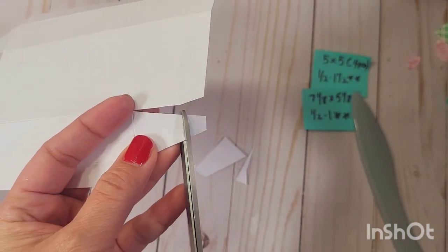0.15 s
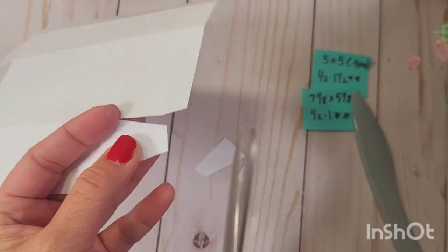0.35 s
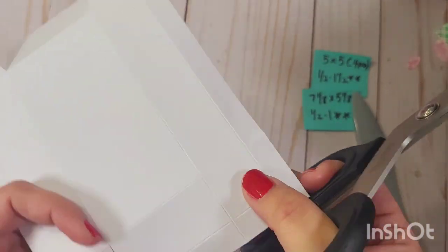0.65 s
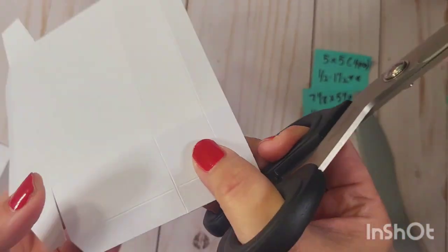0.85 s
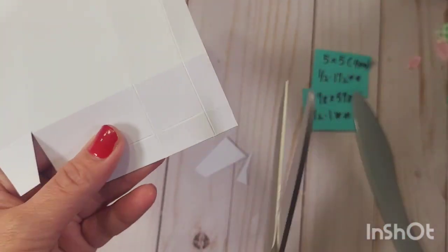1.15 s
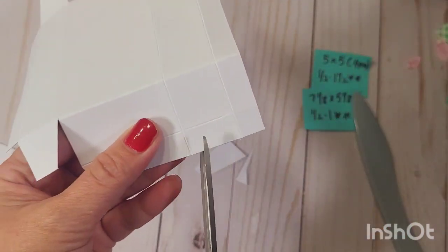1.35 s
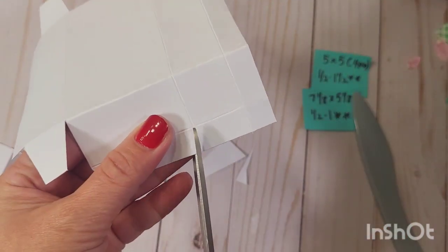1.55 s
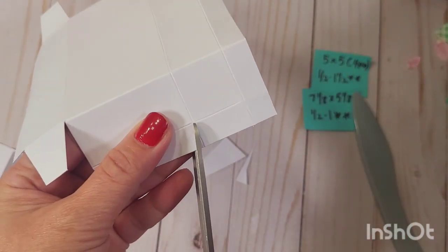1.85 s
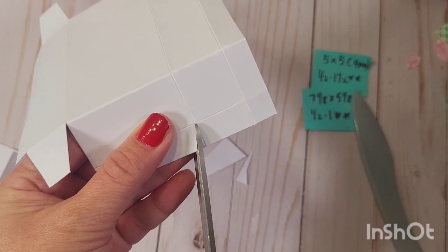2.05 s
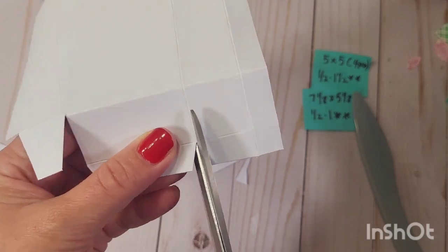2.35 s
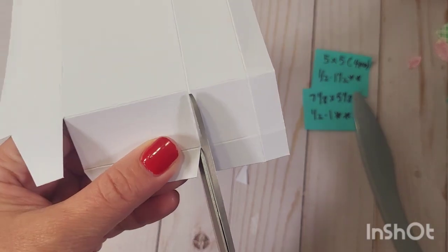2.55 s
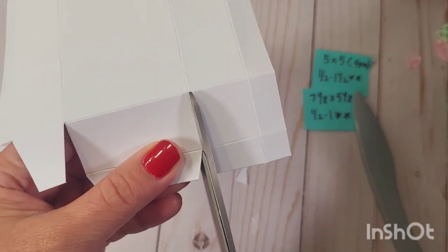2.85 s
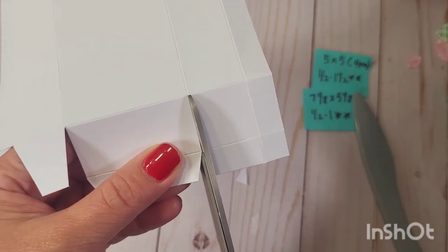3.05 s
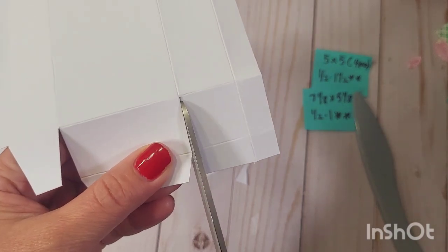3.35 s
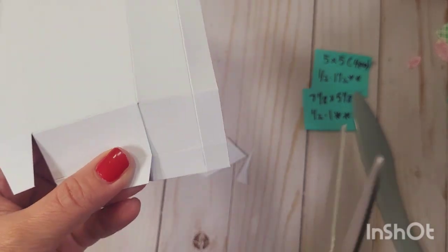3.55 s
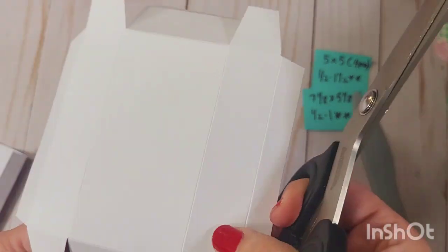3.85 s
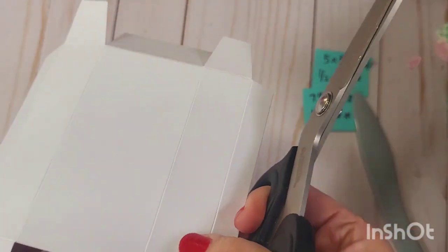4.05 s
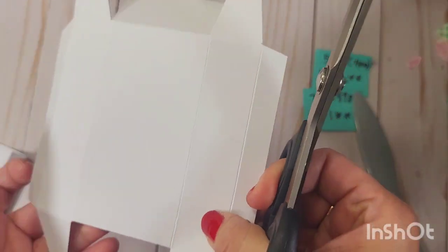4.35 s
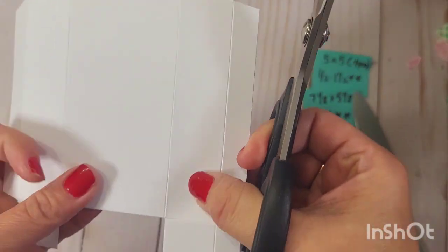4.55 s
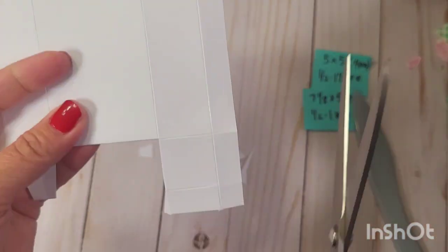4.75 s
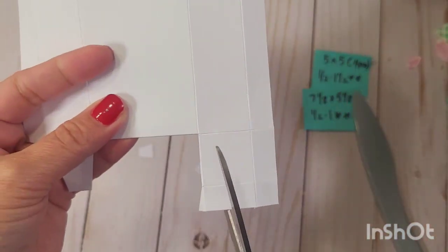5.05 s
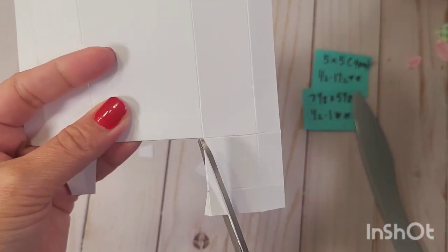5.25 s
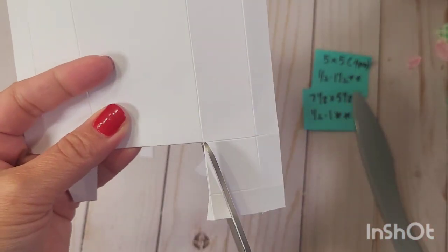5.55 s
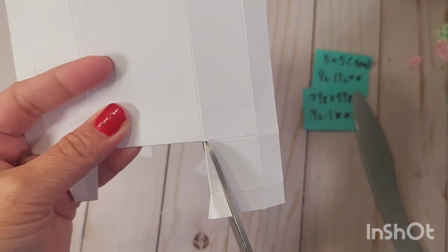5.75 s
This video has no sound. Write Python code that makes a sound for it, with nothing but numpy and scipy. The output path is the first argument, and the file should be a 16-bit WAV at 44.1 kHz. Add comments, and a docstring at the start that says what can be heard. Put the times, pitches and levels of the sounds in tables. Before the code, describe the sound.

Very close stereo sound of scissors and a stiff card sheet at a craft table. A faint squeak leads to a crisp snip, then steel scrapes, card rustle and a soft low puff as the sheet swings. A second snip follows, then crackly slips, a tiny scrap tap, more handling, and a final slow, jerky cut. Small dry room, very quiet low hum behind.

```python
"""Craft table in a small, dry room: scissors trim the flaps of a cardstock box.
Blades squeak, crunch through card and clack shut: friction noise and struck steel modes.
The sheet rubs, slips, flexes and ticks: fibre clicks through card resonances; swung, it fans air and rumbles.
The blades hiss open, a scrap taps the table, and a last slow cut bites in jerks.
Behind: quiet air and a faint, wavering low drone of four partials, like a far motor."""
import sys
import numpy as np
from scipy import signal
from scipy.fft import rfft, irfft, next_fast_len
from scipy.io import wavfile
from scipy.ndimage import map_coordinates

SR = 44100
rng = np.random.default_rng(int(sys.argv[2]) if len(sys.argv) > 2 else 0)


def digitize_waveform(pressure):
    """Quantize a signal to 16-bit integers and store it at the path in sys.argv[1].

    Rows of a 2-D input are taken as channels; values are limited to [-1, 1].
    """
    field = np.atleast_2d(pressure).T
    bounded = np.clip(field, -1, 1)
    quanta = np.round(bounded * 32767).astype(np.int16)
    wavfile.write(sys.argv[1], SR, quanta)


N = 260799
TIME = np.arange(N) / SR

# Far drone. Each row: time in seconds, mean pitch in Hz.
DRONE_PITCH = [(0, 76.44), (0.498, 70), (1.751, 84), (2.3, 86.94), (2.6, 70.7), (4.751, 69.2),
               (5.452, 77.36), (5.91, 81)]
# Drone partials, from the fundamental up: level in dB.
DRONE_PARTIALS_DB = [2.5, -17, -19, -20.5]
# Drone swells. Each row: start in seconds, end in seconds, level in dB.
DRONE_SWELLS = [(4.303, 4.455, -62.5), (5.012, 5.062, -63), (5.35, 5.457, -55.5), (5.79, 5.91, -54)]
DRONE_DB, DRONE_SWELL_S = -73.5, 0.08
# Room air spectrum. Each row: frequency in Hz, relative density in dB per Hz.
AIR_COLOUR = [(25, -13), (70, 3.5), (170, -15.5), (400, -26.5), (700, -27.5), (1500, -31), (5000, -38.5),
              (10000, -41.5), (16000, -38.5)]
AIR_DB = -69.5

# Squeak of blades pressed into card. Each row: time in seconds, level in dB.
SQUEAK = [(0.0, -75), (0.03, -65), (0.08, -81.5), (0.12, -82)]
# Squeak resonances. Each row: frequency in Hz, relative level in dB, T60 in seconds.
SQUEAK_MODES = [(1900, -6, 0.023), (2300, -10.5, 0.02), (3532, -2.5, 0.02), (5200, -6, 0.02),
                (7600, -0.5, 0.0061)]
# Blades sing sliding shut: end of swell in seconds, start of decay in seconds, level in dB.
SING = (0.17, 0.16, -56.5)
# Singing tone. Each row: frequency in Hz, relative level in dB, T60 in seconds.
SING_MODES = [(2390, 0, .04)]

# Steel catching on steel. Each row: time in seconds, hiss level in dB, decay constant in seconds,
# blade ring above the hiss in dB.
SCRAPES = [(0.174, -57, 0.021, 13.5), (0.311, -42, 0.0028, 1.5), (0.384, -43.5, 0.0089, 1),
           (0.508, -54.5, 0.0033, -6), (.584, -33, 0.0033, -7), (1.101, -41, 0.00071, -2),
           (1.11, -50.5, 0.013, 4.5), (3.604, -51, 0.0017, -12), (3.671, -38.5, 0.0014, -37),
           (3.766, -36, 0.0018, -26), (4.635, -44, 0.0024, -29), (4.726, -43.5, 0.0062, 3.5)]
# Blades swinging open. Each row: stop in seconds, hiss level in dB, blade ring above the hiss in dB.
OPENINGS = [(1.351, -52, -5.5), (3.721, -41, -9.5), (4.995, -49, -19)]
# Edge hiss spectrum. Each row: frequency in Hz, relative density in dB per Hz.
STEEL_COLOUR = [(2000, -19), (4000, -0.5), (7000, 10.5), (11000, 13.5), (15500, 17), (17000, 2)]
# Blade ring spectrum. Each row: frequency in Hz, relative density in dB per Hz.
BLADE_COLOUR = [(2150, -16), (2450, -8.5), (2800, -9), (3800, -7.5), (4800, -0.5), (6200, -6.5), (7700, -3),
                (10000, -10)]
SCRAPE_MAX_RISE_S, OPENING_RISE_S, OPENING_FALL_S = 0.012, .036, 0.014

# Blades snapping shut. Each row: time in seconds, clack gain in dB, crunch gain in dB,
# crunch rise in seconds, card thump gain in dB, left-over-right pan in dB.
SNIPS = [(0.1946, -8.5, -28.0, 0.003, -41.0, 1.5), (2.0969, -8.8, -27.0, 0.006, -25.5, 0.5)]
# Ring of the held scissors. Each row: frequency in Hz, relative level in dB, T60 in seconds.
BLADE_MODES = [(1430, -20.5, .022), (2447, -9, .032), (2940, -18, .016), (4480, -9.5, .012),
               (4660, 1.5, .013), (5050, -6, .016), (6500, -13.5, .022), (7080, -10, .012),
               (7400, -9, .011), (9700, -25, .008), (11500, -19, .007)]
# Thump of the parting card. Each row: frequency in Hz, relative level in dB, T60 in seconds.
THUMP_MODES = [(440, -17.5, 0.075), (600, -9, .04), (840, 3, 0.016), (1095, 2.5, 0.016)]
# Noise in the clack. Each row: frequency in Hz, relative density in dB per Hz.
CRACK_COLOUR = [(250, -20.0), (600, -8.5), (1000, -3.5), (1400, -6.5), (1900, -9.5), (2500, 0.0),
                (3400, -4.0), (4700, 1.5), (6000, -6), (7400, 3.5), (9500, -12), (16000, -17.5)]
CRUNCH_BANDS_DB = [-17, 0, -4]   # flexing, body, hiss

# Sheet sliding and turning. Each row: start in seconds, end in seconds, mid-move body level in dB,
# swell over the move in dB, flexing above the body in dB, hiss above the body in dB.
RUBS = [(0.338, 0.386, -58.5, 6, -21, 3), (0.429, 0.532, -68, -10.5, -7, -5),
        (0.544, 0.639, -50.5, -8, -3.5, 4.5), (0.67, .775, -56.5, -9, 0, 3.5),
        (0.822, 0.939, -46, -2.5, 1.5, -5), (0.967, 1.001, -55, -9, -1.5, 0.5),
        (1.04, 1.337, -68.5, 0, -2, 3), (1.562, 1.619, -69, -3.5, 4, -4), (2.189, 2.284, -69, 16, 2, -2),
        (2.304, 2.41, -53.5, -3, -14, -5), (2.421, 2.583, -63.5, 10.5, -7.5, -6),
        (2.94, 2.981, -62.5, 6, -10, -8), (3.349, 3.434, -50.5, 6.5, -6, -2.5),
        (3.48, 3.558, -74.5, 1, -4, 8), (3.771, 3.847, -59.5, -14, 2, -3),
        (3.86, 3.95, -57, -1.5, -3.5, -1), (4.016, 4.11, -63.5, 9.5, -6.5, 3.5),
        (4.1, 4.24, -66.5, 9, -12, -1), (4.32, 4.54, -69.5, 0.5, 3, -1.5),
        (4.543, 4.749, -64.5, -0.5, -1, 4), (4.771, 4.829, -78.5, -4, -0.5, 6),
        (5.019, 5.098, -59, 8.5, -5, -5.5)]
RUB_ATTACK_S, RUB_RELEASE_S, GRIP_DB = 0.008, 0.014, 0.6
CRINKLES_PER_S, CRINKLE_DB, CRINKLE_S = 22, 2, .003   # small catches in a sliding sheet

# Slips of card on blades and fingers. Each row: time in seconds, body level in dB,
# flexing above the body in dB (ahead of FLEX_TRIM_DB), hiss above the body in dB, decay constant in seconds.
SLIPS = [(0.541, -56, -15, 12, .006), (.622, -40.5, 1.5, -18, 0.017), (0.825, -37, -22, 4, 0.015),
         (0.842, -34.5, 8.5, -5, 0.012), (2.065, -37, -14, -2.5, 0.004), (2.251, -51.5, 8, -3, 0.0058),
         (2.322, -44.5, 0, -8, 0.013), (2.957, -50, -2, -4, 0.015), (2.982, -50.5, -8, -4, 0.0014),
         (3.01, -52, -1.5, -12, 0.0017), (3.208, -45.5, 0, -4.5, 0.0033),
         (3.236, -32.5, -4.5, -7.5, 0.0037), (3.249, -31, -5, -6, 0.0027), (3.265, -37.5, 5, -2, 0.0047),
         (3.275, -30, -1, -0.5, 0.0099), (3.435, -44.5, 13.5, -15, 0.0082), (3.44, -33, -30, 1, 0.0087),
         (3.465, -46, 15, -25, 0.0034), (3.763, -57, 8, 0, 0.0043), (3.896, -44, -0.5, -7, 0.0087),
         (3.967, -42.5, 4.5, 2.5, 0.00067), (4.119, -34.5, -3, -4.5, 0.0074), (4.133, -45, 9.5, -9, 0.011),
         (4.181, -52, 7, -6, 0.019), (4.241, -41.5, 11.5, -7, 0.0089), (4.266, -38, -19, -4, 0.0051),
         (4.412, -53.5, 4, -1.5, 0.033), (4.452, -45, -2, -23, 0.001), (5.019, -58, 12.5, -1, 0.01),
         (5.164, -71, 19.5, -7.5, 0.04), (5.309, -70.5, 22, -12, 0.014)]
SLIP_RISE_S, FLEX_TRIM_DB = 0.0039, -4.0
PUFF_DB, PUFF_RISE_S, PUFF_FALL_S = -20.5, .012, 0.01   # air pushed by a flexing sheet

# Air pushed at the microphone by each swing of the sheet. Each row: time in seconds, level in dB.
WAFTS = [(0.55, -43.5), (.58, -39.5), (.845, -33.5)]
# Moving air spectrum. Each row: frequency in Hz, relative density in dB per Hz.
WAFT_COLOUR = [(25, -9), (60, 8), (100, 12), (160, -0.5), (260, -4.5), (500, -41.5)]
# Hollow rumble of the swung sheet. Each row: time in seconds, level in dB.
RUMBLE = [(0.85, -66), (1.0, -50), (1.1, -58.5), (1.35, -65), (1.6, -82.5)]
# Rumble spectrum. Each row: frequency in Hz, relative density in dB per Hz.
RUMBLE_COLOUR = [(150, -13), (240, 1.5), (300, 2.5), (400, -2.5), (600, -29)]
WAFT_RISE_S, WAFT_FALL_S, WAKE_DB, WAKE_S = 0.012, 0.041, -14, 0.15   # each gust leaves a slower wake

# Ring of a light scrap. Each row: frequency in Hz, relative level in dB, T60 in seconds.
TAP_MODES = [(2320, -35, 0.011), (2260, 3, 0.027), (2820, -2, 0.016), (3830, -0.5, 0.0049)]
TAP_S, TAP_DB = 3.3965, -27

# Slow cut. Each row: time in seconds, bites per second, level in dB.
SLICE = [(5.463, 34.7, -62), (5.655, 31, -59), (5.77, 31, -61.5), (5.80, 43, -59.5), (5.91, 34.4, -39.5)]
# Slow cut by band, flexing then body then hiss: level in dB.
BITE_BANDS_DB = [-5.5, -3.5, -4]
BITE_RISE_S, BITE_FALL_S, BITE_DRAG_DB = .003, .005, -10   # the blades drag on between bites
BITE_SCATTER_DB, BITE_SCATTER_S = 1.8, .002

# Card friction spectrum. Each row: frequency in Hz, relative density in dB per Hz.
CARD_COLOUR = [(120, 3.5), (400, 6.5), (680, -7.5), (1000, -14.5), (1800, -19), (3000, -13), (5000, -15),
               (7500, -23.5), (10000, -28), (16000, -27.5)]
# Resonances of the held sheet. Each row: frequency in Hz, width in Hz, nominal boost in dB.
CARD_MODES = [(215, 17, 3.5), (406, 110, 6.5), (1043, 120, 4), (1435, 190, 13.5), (2310, 410, 8.5),
              (3470, 350, 3.5), (4620, 1400, 2.5), (7750, 900, 4.5)]
# Sound each port hears alone, against what both share, flexing then body then hiss: level in dB.
SHEET_SPREAD_DB = [-12, -3, 3]
SHEET_ECHO_S, SHEET_SWAY_S, SHEET_ECHO_DB = .0013, .00025, -5
# Table echo delay, left then right, in seconds.
TABLE_ECHO_S = (.00066, .00043)
TABLE_ECHO_DB = -9
ROOM_T60_S, TREBLE_T60_S, ROOM_DB = 0.098, .075, -10.5
RIGHT_LAG_S, BLADE_LAG_S = .00007, .00009
CUTOFF_HZ = 16300


def from_db(db):
    """Decibels to gain."""
    return 10 ** (np.asarray(db) / 20)


def rms_one(x):
    """Scale to unit power."""
    return x / np.sqrt(np.mean(x ** 2) + 1e-20)


def level(rows, column):
    """Gain from one dB column of a curve, gated by 10 ms ramps centred on both ends."""
    s, db = np.array(rows)[:, 0], np.array(rows)[:, column]
    gate = np.interp(TIME, [s[0] - .005, s[0] + .005, s[-1] - .005, s[-1] + .005], [0, 1, 1, 0])
    return gate * from_db(np.interp(TIME, s, db))


def coloured(x, spectrum):
    """Filter by a smooth spectrum, dB linear in log frequency; unit power."""
    hz, db = np.transpose(spectrum)
    size = next_fast_len(N, real=True)
    bins_hz = np.maximum(np.arange(size // 2 + 1) * SR / size, 1)
    gain = from_db(np.interp(np.log(bins_hz), np.log(hz), db))
    return rms_one(irfft(rfft(x, size) * gain, size)[..., :N])


def drift(per_s):
    """Slow random wander with a spread of 1."""
    return coloured(rng.standard_normal(N), [(per_s, 0), (10 * per_s, -60), (100 * per_s, -120)])


def burst(s, rise_s, fall_s):
    """Envelope that swells quickly up to time s and dies away."""
    envelope = np.zeros(N)
    near = slice(max(round((s - .05) * SR), 0), round((s + .2) * SR))
    t = TIME[near] - s
    envelope[near] = np.exp(-np.where(t < 0, (t / rise_s) ** 2, t / fall_s))
    return envelope


def stroke(start, end, attack_s, release_s):
    """Envelope that swells up to its start, holds, and dies away after its end."""
    before = (np.maximum(start - TIME, 0) / attack_s) ** 2
    after = np.maximum(TIME - end, 0) / release_s
    return np.exp(-np.minimum(before + after, 40))


def ring(x, modes):
    """Decaying tones set off by x; they radiate little below their pitch."""
    out = 0
    for hz, db, t60_s in modes:
        r, w = from_db(-60 / (t60_s * SR)), 2 * np.pi * hz / SR
        out = out + from_db(db) * signal.lfilter([.5, 0, -.5], [1, -2 * r * np.cos(w), r * r], x + 1e-18)
    return out


def fibres(per_s, spread_db, smooth):
    """Paper fibres catch and let go: clicks of uneven size over a smooth hiss."""
    sizes = from_db(spread_db * np.minimum(rng.exponential(1, N), 4))
    clicks = (rng.random(N) < per_s / SR) * sizes * rng.choice([-1, 1], N)
    return rms_one(rms_one(clicks) + smooth * rng.standard_normal(N))


def card_bands(friction):
    """Friction heard through the sheet, split into its flexing, its body and its surface hiss."""
    x = coloured(friction, CARD_COLOUR)
    for hz, width_hz, boost_db in CARD_MODES:
        reach = from_db(3.0 * drift(25) - 1)   # each contact point drives other resonances
        resonance = signal.lfilter(*signal.iirpeak(hz, hz / width_hz, fs=SR), x)
        x = x + reach * (from_db(boost_db) - 1) * resonance
    # resonances shift as the sheet bends
    bent_time = np.cumsum(1 + .025 * drift(4.0))
    x = map_coordinates(x, [bent_time], order=3, mode="mirror")
    bands_hz = [(130, 800), (800, 6000), (6000, 16500)]
    filters = [signal.butter(3, band, "band", fs=SR, output="sos") for band in bands_hz]
    return [rms_one(signal.sosfilt(sos, x)) for sos in filters]


def microphones(x, pan_db=0.0, lag_s=RIGHT_LAG_S):
    """Two close ports: a positive lag delays the right one, a positive pan favours the left."""
    return np.array([x, np.roll(x, round(lag_s * SR))]) * from_db([[pan_db / 2], [-pan_db / 2]])


def sheet(friction, envelopes):
    """Friction on the wide sheet, by band; the shorter the wave, the less the ports agree."""
    out = 0
    for band, envelope, spread_db in zip(card_bands(friction), envelopes, SHEET_SPREAD_DB):
        own = np.array([np.roll(band, SR), np.roll(band, 2 * SR)])
        out = out + envelope * rms_one(microphones(band) + from_db(spread_db) * own)
    return out


def background():
    """Wavering harmonic drone over the quiet air of the room."""
    s, hz = np.transpose(DRONE_PITCH)
    pitch_hz = np.interp(TIME, s, hz) * (1 + .025 * drift(12))
    phase = 2 * np.pi * np.cumsum(pitch_hz) / SR
    strength = from_db(DRONE_DB)
    for start, end, db in DRONE_SWELLS:
        strength = strength + from_db(db) * stroke(start, end, DRONE_SWELL_S, DRONE_SWELL_S)
    partials = sum(from_db(db) * np.sin(k * phase) for k, db in enumerate(DRONE_PARTIALS_DB, 1))
    drone = strength * partials * from_db(1.5 * drift(8))
    # partly shared by the ports
    air = coloured(rng.standard_normal(N) + .5 * rng.standard_normal((2, N)), AIR_COLOUR)
    return microphones(drone, pan_db=2.6) + from_db(AIR_DB) * air


def squeak():
    """Steel sticks and slips against the card's edge, then sings as the blades slide shut."""
    start, end, db = SING
    friction = fibres(2000, 2.0, 0.85)
    sing = from_db(db) * stroke(start, end, 0.014, .008) * rms_one(ring(friction, SING_MODES))
    return microphones(level(SQUEAK, 1) * rms_one(ring(friction, SQUEAK_MODES)) + sing)


def scrapes():
    """Edge slides on edge with a bright hiss, and the blades ring along."""
    hiss = coloured(fibres(7900, 7.3, 1.0), STEEL_COLOUR)
    blades = coloured(fibres(3500, 5.9, 0.51), BLADE_COLOUR)
    moves = [(burst(s, min(fall_s, SCRAPE_MAX_RISE_S), fall_s), db, ring_db)
             for s, db, fall_s, ring_db in SCRAPES]
    moves += [(stroke(s, s, OPENING_RISE_S, OPENING_FALL_S), db, ring_db) for s, db, ring_db in OPENINGS]
    out = sum(from_db(db) * envelope * (hiss + from_db(ring_db) * blades) for envelope, db, ring_db in moves)
    return microphones(out, pan_db=0, lag_s=-.00003)


def snips():
    """The last fibres crunch, the blades run free and clack together, and the card springs apart."""
    crunch_bands = card_bands(fibres(5000, 3.0, .4))
    crunch = sum(from_db(db) * band for db, band in zip(CRUNCH_BANDS_DB, crunch_bands))
    crack = coloured(rng.standard_normal(N), CRACK_COLOUR)
    no_bass = signal.butter(2, 350, "high", fs=SR, output="sos")   # thin blades radiate no bass
    out = 0
    for s, clack_db, crunch_db, crunch_rise_s, thump_db, pan_db in SNIPS:
        hit = np.zeros(N)
        hit[round(s * SR)] = 1
        steel = from_db(-8) * ring(hit, BLADE_MODES)
        snap = from_db(-1) * crack * burst(s + .0003, .0003, .0012)
        clack = from_db(clack_db) * signal.sosfilt(no_bass, steel + snap)
        cut = from_db(crunch_db) * crunch * burst(s, crunch_rise_s, .011)
        thump = from_db(thump_db) * ring(hit, THUMP_MODES)
        out = out + microphones(clack + cut + thump, pan_db, BLADE_LAG_S)
    return out


def rubbing():
    """The sheet drags over skin and steel with a fine, uneven grain, and now and then it catches."""
    flex = body = hiss = 0
    for start, end, db, swell_db, flex_db, hiss_db in RUBS:
        progress = np.clip((TIME - start) / (end - start), 0, 1)
        move = from_db(db + swell_db * (progress - .5)) * stroke(start, end, RUB_ATTACK_S, RUB_RELEASE_S)
        flex = flex + from_db(flex_db) * move
        body = body + move
        hiss = hiss + from_db(hiss_db) * move
    catches = (rng.random(N) < CRINKLES_PER_S / SR) * rng.random(N)
    decay = np.exp(-1 / (CRINKLE_S * SR))
    crinkle = from_db(CRINKLE_DB) * signal.lfilter([1], [1, -decay], catches + 1e-18)
    grip = from_db(GRIP_DB * drift(54))
    return sheet(fibres(3000, 5.4, 0.8), [flex, body, hiss]) * (grip + crinkle)


def slips():
    """Each slip is a quick flurry of fibre clicks with a puff of air from the flexing sheet."""
    flex = body = hiss = puff = 0
    for s, db, flex_db, hiss_db, fall_s in SLIPS:
        flurry = from_db(db) * burst(s, SLIP_RISE_S, fall_s)
        flex = flex + from_db(flex_db + FLEX_TRIM_DB) * flurry
        body = body + flurry
        hiss = hiss + from_db(hiss_db) * flurry
        puff = puff + from_db(db + flex_db + PUFF_DB) * burst(s, PUFF_RISE_S, PUFF_FALL_S)
    air = microphones(puff * coloured(rng.standard_normal(N), WAFT_COLOUR))
    return sheet(fibres(4700, 3.32, 1.0), [flex, body, hiss]) + air


def waft():
    """The swinging sheet fans turbulent air across the ports, with a hollow rumble."""
    speed = 0
    for s, db in WAFTS:
        wake = from_db(WAKE_DB) * stroke(s, s, WAFT_RISE_S, WAKE_S)
        speed = speed + from_db(db) * (stroke(s, s, WAFT_RISE_S, WAFT_FALL_S) + wake)
    gust = speed * coloured(rng.standard_normal(N), WAFT_COLOUR)
    eddies = speed * coloured(rng.standard_normal((2, N)), WAFT_COLOUR)   # each port has its own
    rumble = level(RUMBLE, 1) * coloured(rng.standard_normal(N), RUMBLE_COLOUR)
    return microphones(gust + rumble, pan_db=3.6) + from_db(-13.5) * eddies


def scrap():
    """A cut-off piece of card taps the table: an impulse into short modes."""
    tap = np.zeros(N)
    tap[round(TAP_S * SR)] = from_db(TAP_DB)
    return microphones(ring(tap, TAP_MODES), pan_db=-3.5, lag_s=.00006)


def slicing():
    """The closing blades stick and bite at a changing rate; bites scatter in force and time."""
    s, per_s, _ = np.transpose(SLICE)
    count = np.cumsum(np.interp(TIME, s, per_s, left=0)) / SR
    times = TIME[1:][np.diff(np.ceil(count)) > 0]
    bites = 0
    for t in times:
        harder, later = rng.standard_normal(2)
        bite = burst(t + BITE_SCATTER_S * later, BITE_RISE_S, BITE_FALL_S)
        bites = bites + from_db(BITE_SCATTER_DB * harder) * bite
    force = level(SLICE, 2) * (bites + from_db(BITE_DRAG_DB))
    return sheet(fibres(4500, 2.3, 0.94), [from_db(db) * force for db in BITE_BANDS_DB])


def off_table(x):
    """The table returns a sound to each port a fraction of a millisecond later."""
    echoes = [np.roll(port, round(s * SR)) for port, s in zip(x, TABLE_ECHO_S)]
    return x + from_db(TABLE_ECHO_DB) * np.array(echoes)


def over_table(x):
    """The sheet sways above the table, so its echo keeps changing the colour at each port."""
    echoes = []
    for port in x:
        delay_s = SHEET_ECHO_S + SHEET_SWAY_S * drift(3)
        echoes.append(map_coordinates(port, [(TIME - delay_s) * SR], order=3))
    gain = from_db(SHEET_ECHO_DB)
    return (x + gain * np.array(echoes)) / np.sqrt(1 + gain ** 2)


def room(x):
    """Dense reflections off table and walls, different at each port, the treble dying first."""
    t = np.arange(SR // 4) / SR
    noise = rng.standard_normal((2, len(t)))
    bass = signal.butter(2, 350, fs=SR, output="sos")
    noise[1] += signal.sosfiltfilt(bass, noise[0] - noise[1])   # long waves reach both ports alike
    dull = signal.sosfiltfilt(signal.butter(1, 5500, fs=SR, output="sos"), noise)
    tail = dull * from_db(-60 * t / ROOM_T60_S) + (noise - dull) * from_db(-60 * t / TREBLE_T60_S)
    tail = tail * np.clip(t / .002 - 1, 0, 1)   # silent for 2 ms, full by 4 ms
    tail = tail / np.sqrt(np.sum(tail ** 2) / 2)
    return signal.fftconvolve(x, tail, axes=1)[:, :N]


def scene():
    """Hands at work close to the microphone, in the room."""
    card = over_table(rubbing() + slips() + slicing())
    hands = squeak() + scrapes() + off_table(snips()) + scrap() + card
    return background() + hands + from_db(ROOM_DB) * room(hands) + waft()


def record(dry):
    """Steep elliptic low-pass on the top of the treble."""
    return signal.sosfilt(signal.ellip(10, .1, 80, CUTOFF_HZ, fs=SR, output="sos"), dry)


dry = scene()
out = record(dry)
digitize_waveform(out)
```